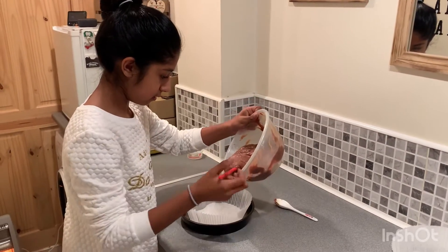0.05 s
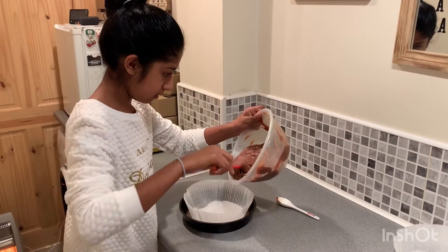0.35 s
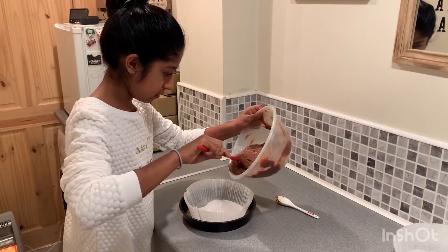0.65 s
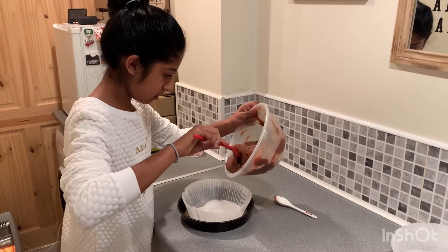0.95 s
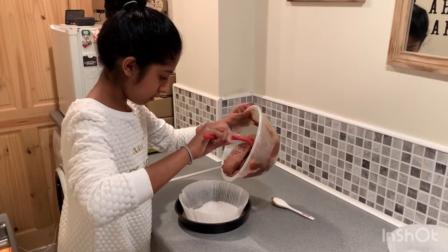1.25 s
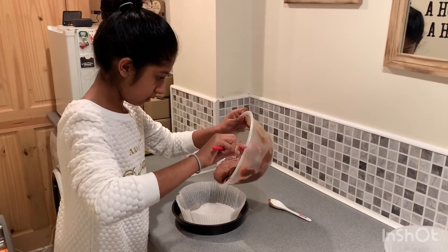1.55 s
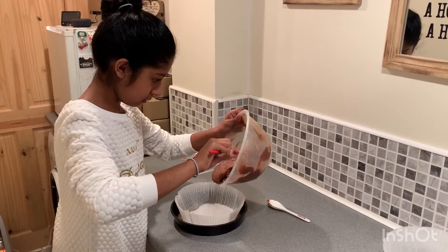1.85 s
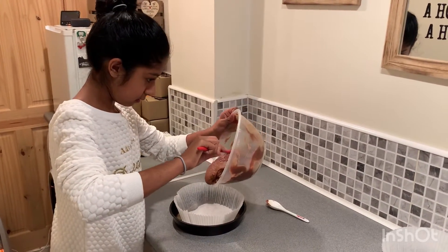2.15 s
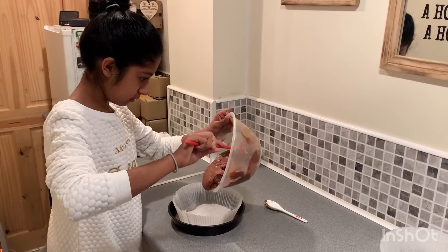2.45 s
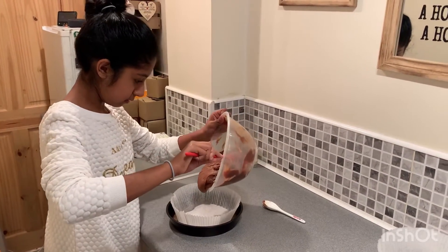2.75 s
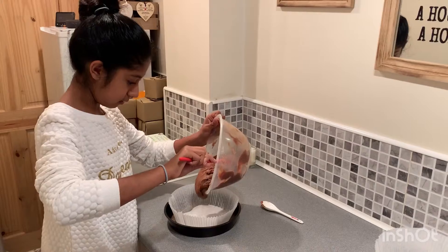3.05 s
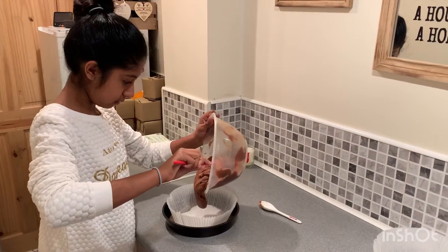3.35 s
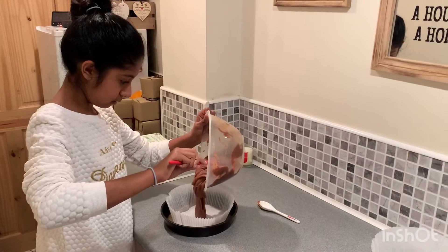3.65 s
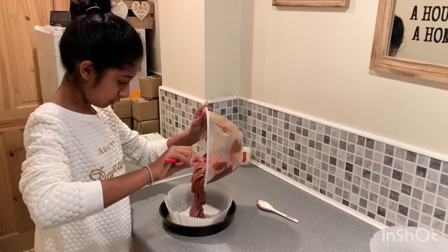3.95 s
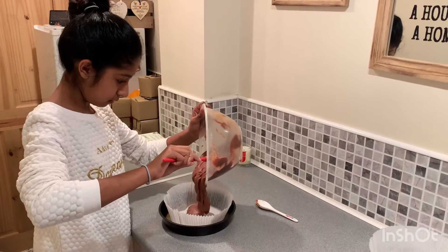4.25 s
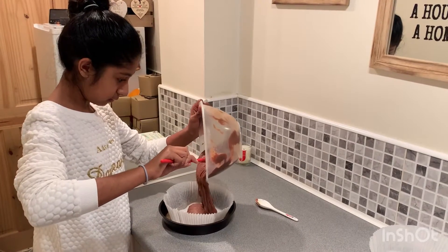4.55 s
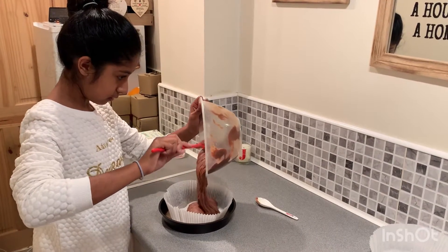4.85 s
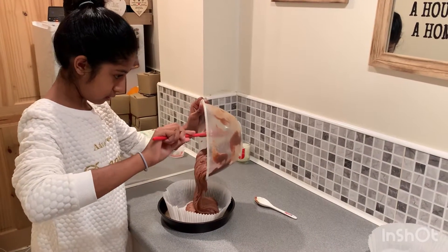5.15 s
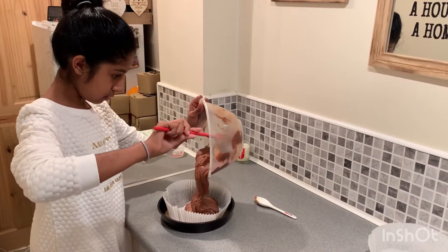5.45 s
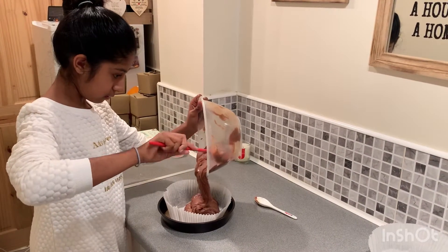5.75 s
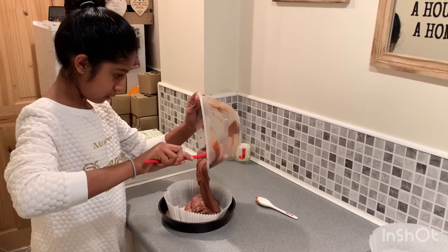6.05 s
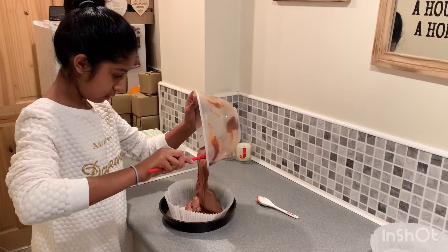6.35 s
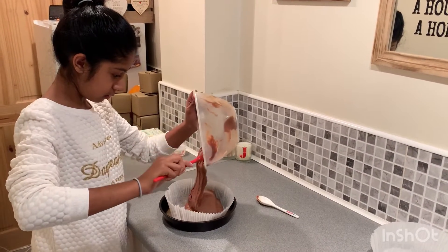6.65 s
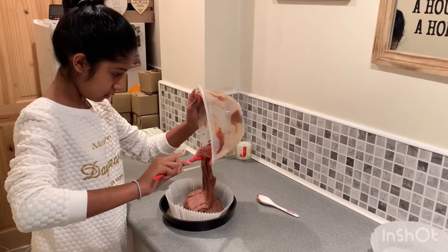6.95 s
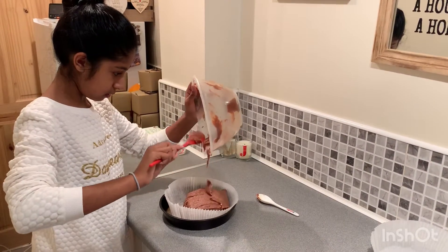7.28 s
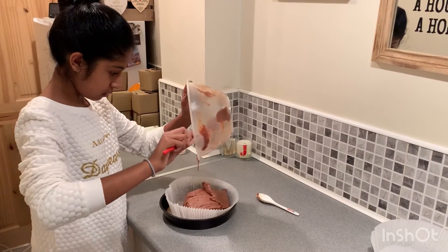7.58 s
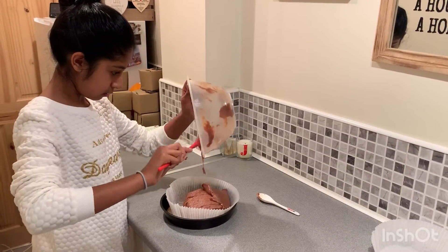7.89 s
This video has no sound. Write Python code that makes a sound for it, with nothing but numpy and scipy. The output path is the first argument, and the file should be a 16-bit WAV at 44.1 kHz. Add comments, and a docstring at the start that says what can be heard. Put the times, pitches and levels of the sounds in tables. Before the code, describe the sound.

Sticky cake batter squelches and crackles as a rubber spatula scrapes and knocks against a plastic mixing bowl in a quiet kitchen.

```python
"""A soft scrape and a squeak, then knocks: a spatula works thick cake batter out of a plastic bowl
into a paper-lined tin. Impacts and stick-slip friction sound low ringing tones of room and bowl.
Cavities in the batter squelch and plop, sticky threads snap, and batter and paper liner crackle.
The small kitchen adds a bright reverberation and a faint hum."""
import sys
import numpy as np
from scipy import signal
from scipy.fft import rfft, irfft, next_fast_len
from scipy.io import wavfile

SR = 44100
rng = np.random.default_rng(int(sys.argv[2]) if len(sys.argv) > 2 else 0)


def generate_wav(sig):
    """Save sig (samples, or channels by samples) to the path in sys.argv[1] as 16-bit PCM at SR."""
    pcm = np.round(np.clip(np.atleast_2d(sig).T, -1, 1) * 32767).astype(np.int16)
    wavfile.write(sys.argv[1], SR, pcm)


N = 349272
TIME, PADDED = np.arange(N) / SR, next_fast_len(N + SR // 10)
LN_1000 = np.log(1000)   # exponent of a 60 dB decay


def from_db(db):
    """Decibels to amplitude ratio."""
    return 10 ** (np.asarray(db) / 20)


def unit_rms(x):
    """Normalise to an rms of one."""
    return x / np.sqrt(np.mean(x ** 2) + 1e-20)


def at_hz(points, hz, column=1):
    """Interpolate a table column over log frequency."""
    table = np.array(points)
    return np.interp(np.log(hz + 1e-9), np.log(table[:, 0]), table[:, column])


def add(track, s, sound):
    """Superpose a sound on a track at s seconds."""
    start = max(round(s * SR), 0)
    track[start:start + len(sound)] += sound[:N - start]


def drift(per_s):
    """Random modulation: Gaussian values joined by straight lines."""
    knots = rng.standard_normal(4000)
    return np.interp(TIME * per_s, np.arange(len(knots)), knots)


def colour(x, spectrum, size=4096):
    """Minimum-phase filter of unit energy with the given spectrum."""
    cepstrum = irfft(np.log(from_db(at_hz(spectrum, np.fft.rfftfreq(size, 1 / SR)))))
    kernel = irfft(np.exp(rfft(2 * cepstrum[:size // 2], size)))
    return signal.oaconvolve(x, kernel / np.linalg.norm(kernel))[:len(x)]


def grains(per_s, spread_db, size):
    """Poisson impulses of uneven strength and sign."""
    strength = from_db(spread_db * np.minimum(rng.exponential(1, size), 3.5))
    return strength * rng.choice([-1, 1], size) * (rng.random(size) < per_s / SR)


def burst(length_s, per_s, first, size=8192):
    """A leading impulse and an exponentially dying shower; unit energy."""
    clicks = grains(per_s, 5.1, size) * np.exp(-TIME[:size] / max(length_s, .001))
    clicks[0] = first
    return clicks / np.linalg.norm(clicks)


# Each row: frequency in Hz, left-right coherence from 0 to 1.
COHERENCE = [(100, .95), (300, .6), (600, .55), (1200, .3), (2500, .4), (4500, .5), (7500, .88),
             (15000, .85)]
def diffuse(a, b):
    """Diffuse field: two independent noises become a partly coherent stereo pair."""
    alike = at_hz(COHERENCE, np.fft.rfftfreq(len(a), 1 / SR))
    mid, side = rfft(a) * np.sqrt((1 + alike) / 2), rfft(b) * np.sqrt((1 - alike) / 2)
    return irfft([mid + side, mid - side], len(a))


# Each row: frequency in Hz, relative spectral density in dB.
AIR_SPECTRUM = [(15, -18), (30, -4.5), (60, 3.5), (85, -1.5), (130, -6), (300, -11), (550, -10.5),
                (800, -18), (1300, -21.5), (2200, -33.5), (3200, -35), (4300, -48.5), (6500, -44),
                (16000, -44)]
# Mains hum and appliance whine. Each row: frequency in Hz, level in dB.
HUM_TONES = [(49, -70.5), (99, -72), (527.6, -69.5)]
def room_tone(air_db=-57.5):
    """Noise floor: broadband air noise under slightly wavering pure tones."""
    air = diffuse(*[colour(white, AIR_SPECTRUM) for white in rng.standard_normal((2, N))])
    hum = sum(from_db(db + 0.5 * drift(6.3)) * np.sqrt(2) * np.sin(2 * np.pi * (hz * TIME + rng.random()))
              for hz, db in HUM_TONES)
    return from_db(air_db) * air + hum


# Each row: frequency in Hz, reverberation time in seconds, echo gain in dB.
REVERBERATION = [(99, 0.46, -17), (296, 0.27, 3), (694, 0.24, 3.5), (1650, 0.49, 4), (4120, 0.19, 6),
                 (9350, 0.4, -2.5), (15300, 0.084, -7.5)]
def echoes(build_s=0.00024):
    """Impulse response: reflections off worktop and tiles decay at their own rate in each octave."""
    t, edges = TIME[:SR // 2], np.geomspace(60, 17000, 9)
    fields = [diffuse(*pair) for pair in rng.standard_normal((2, 2, len(t)))]
    echo = np.zeros((2, len(t)))
    for k, (low, high) in enumerate(zip(edges, edges[1:])):
        hz = np.sqrt(low * high)
        noise = signal.sosfilt(signal.butter(2, [low, high], "band", fs=SR, output="sos"), fields[k % 2])
        tail = noise * np.exp(-LN_1000 * t / at_hz(REVERBERATION, hz)) * (1 - np.exp(-t / build_s))
        gain = 2 * np.sqrt((high - low) / SR) * from_db(at_hz(REVERBERATION, hz, column=2))
        echo += gain * tail / np.linalg.norm(tail)
    return echo


def kitchen(x, move_s=1):
    """Reverberation of a moving source: as the bowl tilts, one echo pattern fades into the next."""
    out = np.zeros((2, N))
    for s in np.arange(0, N / SR + move_s, move_s):
        near = np.abs(TIME - s) < move_s
        part = x[near] * np.cos(np.pi / 2 * (TIME[near] - s) / move_s)
        for channel, echo in zip(out, echoes()):
            add(channel, TIME[near][0], signal.fftconvolve(part, echo))
    return out


# Each row: start in seconds, relative level in dB.
THREAD_SNAPS = [(0.9658, -29.5), (3.589, -42), (3.955, -35), (4.051, -30), (4.101, -40), (4.2783, -25),
                (5.194, -41), (7.011, -43), (7.509, -36), (7.742, -37)]
def snaps(level_db=-2, pair_hz=(8970, 14300), t60_s=0.0038):
    """Sudden release of tension: a thread of batter parts outside the rim with a very high tick."""
    out, t = np.zeros(N), TIME[:SR // 100]
    for s, db in THREAD_SNAPS:
        pitches = np.outer(pair_hz, 1 + .04 * rng.standard_normal())
        tone = np.sin(2 * np.pi * pitches * t).mean(axis=0)
        add(out, s, from_db(db + level_db) * np.exp(-LN_1000 * t / t60_s) * tone)
    return out


# Each row: start in seconds, relative level in dB, decay time in seconds, offset of the body in dB.
CRACKLES = [(0.252, -57.5, 0.021, -8), (.35, -59, 0.066, -25), (.849, -62, 0.0034, 15.5),
            (1.347, -40, 0.028, 8.5), (1.452, -41.5, 0.1, 1), (1.628, -39.5, 0.067, -17),
            (1.761, -32.5, 0.095, 9), (1.953, -42, 0.027, 18.5), (2.022, -43, 0.0093, 15),
            (2.209, -50.5, 0.014, 17), (2.312, -29.5, 0.12, -2), (2.505, -47, 0.037, -2),
            (2.77, -73, 0.11, 2), (3.28, -62, 0.0074, -15), (3.478, -56, 0.012, -15),
            (3.584, -38.5, 0.012, 6.5), (3.594, -34.5, 0.0093, 4.5), (3.609, -28, 0.0085, 5),
            (3.801, -40.5, 0.007, 9), (3.924, -46.5, .02, -3), (3.944, -41, 0.008, 4),
            (3.956, -32, 0.0037, -3.5), (4.013, -39, 0.014, -1), (4.053, -35.5, 0.0036, 2.5),
            (4.083, -40, 0.013, 9.5), (4.101, -33, 0.0036, 7.5), (4.276, -33, 0.0088, -1),
            (4.474, -45, 0.011, 13), (4.559, -33, 0.006, 7.5), (5.19, -36, 0.023, -7),
            (5.225, -59, 0.0069, -4), (5.46, -34.5, 0.036, -3), (5.512, -40, 0.016, 12),
            (5.555, -40, 0.0098, 2), (5.685, -44.5, 0.025, 12), (5.733, -43.5, 0.039, 13),
            (6.072, -54, 0.018, -8), (6.469, -51, 0.038, -1), (6.693, -50.5, 0.0056, 7),
            (6.852, -54, 0.11, -2), (7.012, -33.5, 0.021, -34), (7.132, -50, 0.0099, 4),
            (7.237, -43.5, 0.0067, 10), (7.291, -47.5, 0.003, 12.5), (7.739, -35.5, 0.52, 8)]
# Each row of both spectra: frequency in Hz, relative density in dB.
FIZZ_SPECTRUM = [(200, -9), (2000, -2.5), (4500, 4), (7000, 3.5), (9000, 9), (13000, -1.5), (15500, -6)]
PAPER_SPECTRUM = [(60, -36), (300, -7), (700, 11), (1400, 0), (2100, 14.5), (3100, 7), (4500, 4.5),
                  (7000, -16.5), (12000, -0.5)]
def crackles(fizz_db=15, paper_db=11):
    """Impulsive noise: tiny batter films break with a bright fizz; bigger folds add a papery body."""
    fizz, paper = np.zeros((2, N))
    for s, db, length, body_db in CRACKLES:
        lead = 1.3 * min(1, 0.0094 / length)   # short crackles open with a clear snap
        clicks = from_db(db) * burst(length, per_s=1500, first=lead)
        add(fizz, s, clicks)
        add(paper, s, from_db(body_db) * clicks)
    return (from_db(fizz_db) * colour(fizz, FIZZ_SPECTRUM),
            from_db(paper_db) * colour(paper, PAPER_SPECTRUM))


# Each row: start in seconds, level in dB, pitch in Hz, 60 dB decay time in seconds.
SQUEAKS = [(.051, -49, 3600, 0.057), (1.141, -59.5, 4350, 0.046), (1.76, -29.5, 2040, 0.058),
           (7.012, -42, 2434, 0.041)]
def squeaks(waver=.07, attack_s=.001):
    """Nearly periodic stick-slip: the rubber blade sounds a short, rough note on the wet wall."""
    out, t = np.zeros(N), TIME[:SR // 8]
    for s, db, hz, t60 in SQUEAKS:
        pitch = hz * (1 + waver * drift(490)[:len(t)])
        envelope = (1 - np.exp(-t / attack_s)) * np.exp(-LN_1000 * t / t60)
        add(out, s, from_db(db) * envelope * np.sin(2 * np.pi * np.cumsum(pitch) / SR))
    return out


# Each row: start in seconds, relative levels of pop and chirp in dB, final chirp pitch in Hz.
AIR_POCKETS = [(0.449, -38.5, -53, 1320), (1.340, -31, -35.5, 2660), (2.480, -27, -32.5, 2546),
               (2.763, -34.5, -48, 2090), (3.046, -30.5, -46, 2210), (5.507, -51, -37, 2420),
               (6.521, -36.5, -60, 1930)]
# Each row: frequency in Hz, relative spectral density in dB.
POP_SPECTRUM = [(200, -11.5), (450, -0.5), (800, -5.5), (1100, -4), (1600, -10), (2300, -16.5), (3000, -32),
                (6000, -41.5)]
def plops(pop_db=13, chirp_db=2, chirp_s=0.00579, rise_octaves=1.32):
    """Helmholtz resonance: trapped air escapes with a dull pop and a rising chirp as the pocket opens."""
    pops, chirps = np.zeros((2, N))
    opening = np.linspace(0, 1, int(chirp_s * SR))
    swell = np.sin(np.pi * opening ** 2)
    for s, db, tone_db, hz in AIR_POCKETS:
        add(pops, s, from_db(db + pop_db) * burst(length_s=.009, per_s=2500, first=2.5))
        pitch = hz * 2 ** (rise_octaves * (opening - 1))
        add(chirps, s, from_db(tone_db + chirp_db) * swell * np.sin(2 * np.pi * np.cumsum(pitch) / SR))
    return colour(pops, POP_SPECTRUM) + chirps


def ribbon_folds(count=24, start_s=3.5, end_s=7.6, low_hz=2380, high_hz=12600):
    """Viscous buckling: the falling batter folds at uneven intervals; gives rows of faint squelches."""
    rows = []
    for k, (when, force, pitch) in enumerate(rng.random((count, 3))):
        s = start_s + (end_s - start_s) * (k + when) / count
        db = -68.5 + 5 * (2 * force - 1)
        rows.append((s, db, low_hz * (high_hz / low_hz) ** pitch, 0.012, 2))
    return rows


# Each row: start in seconds, level in dB, pitch in Hz, length in seconds, Q (raised to at least 1).
SQUELCHES = [(0.845, -58, 9600, .004, 6.3), (0.963, -55.5, 9300, 0.012, 0.73),
             (1.226, -65, 2390, 0.021, 0.42), (1.273, -65, 1260, .03, 1.1), (1.265, -63, 8800, .015, 0.9),
             (1.343, -48.5, 1440, 0.075, 1.7), (1.861, -50, 3130, 0.012, 6.3),
             (1.893, -51, 2900, 0.0092, 2.5), (1.951, -46, 4000, 0.015, 1), (2.2, -48.5, 2830, 0.011, 2.9),
             (2.314, -61, 14000, 0.1, 2.5), (2.6, -79, 5000, 0.24, 1.5), (2.538, -58, 14000, .025, 1.9),
             (3.249, -54.5, 1990, 0.0084, 1.1), (3.307, -69.5, 4000, 0.064, 2.6),
             (4.362, -56, 4150, 0.015, 2.5), (4.413, -51, 2080, 0.0099, 5.4), (4.556, -48, 4400, 0.013, 3),
             (4.697, -63, 14100, 0.014, 2.5), (4.835, -61, 13800, 0.065, 1.8),
             (5.133, -56.5, 3770, 0.13, 2.6), (5.254, -45.5, 2340, 0.022, 4),
             (5.307, -46, 1940, 0.023, 2.3), (5.446, -45.5, 4430, 0.0094, 1.3),
             (5.507, -43, 1610, 0.019, 2.8), (5.555, -43.5, 2540, 0.01, 3.1),
             (5.725, -52, 2500, 0.017, 3.2), (6.166, -63, 2440, 0.021, 3.6),
             (6.314, -61.5, 2240, 0.012, 2.5), (7.004, -47.5, 12900, 0.018, 2),
             (7.24, -59, 1180, 0.063, 1.6), (7.818, -54, 4500, 0.023, 12), (7.883, -47, 2540, 0.024, .71)]
def squelches(slips_per_s=3000):
    """Cavity resonance: a swell of tiny slips rings the gap between blade and batter."""
    out = np.zeros(N)
    for s, db, hz, length, q in SQUELCHES + ribbon_folds():
        size = max(int(length * SR), 256)
        slips = grains(slips_per_s, 10.6, size) * np.sin(np.pi * np.linspace(0, 1, size) ** 0.35)
        cavity = signal.iirpeak(hz, max(q, 1), fs=SR)
        add(out, s, from_db(db) * unit_rms(signal.lfilter(*cavity, signal.lfilter(*cavity, slips))))
    return out


# Each row: frequency in Hz, relative spectral density in dB.
SMEAR_SPECTRUM = [(500, -12.5), (800, 6.5), (1200, -1.5), (1600, -0.5), (2100, 3), (2600, 0.5), (3100, -1),
                  (4400, -3.5), (6000, -10.5), (9000, -11.5), (15000, -15)]
def wet_smear(catch_db=3.5, catches_per_s=45, smack_db=-7):
    """Modulated shot noise: pockets of many sizes crackle and smack as the blade catches and slips."""
    drag = unit_rms(from_db(catch_db * drift(catches_per_s)))
    pockets = np.zeros(N)
    for hz in np.geomspace(900, 14000, 16):
        opening = from_db(5 * drift(24))
        pockets += signal.lfilter(*signal.iirpeak(hz, 6, fs=SR), opening * unit_rms(grains(1000, 6.5, N)))
    smacks = from_db(smack_db) * unit_rms(grains(90, 6.6, N))
    return colour(drag * (unit_rms(pockets) + smacks), SMEAR_SPECTRUM)


# Low ringing tones of room and bowl, sounded by knocks and scraping, and the bowl's stiff upper modes.
# Each row: frequency in Hz, relative level in dB, 60 dB decay time in seconds.
LOW_RESONANCES = [(77, 2.5, 0.37), (145, 0, 0.22), (167.6, -10.5, 0.41), (203, -13.5, 0.18),
                  (260.4, -5.5, 0.21), (283.7, -3.5, 0.23), (326.6, 4, 0.13), (369, 0, 0.13),
                  (427.8, -3.5, 0.12), (492.8, -4.5, 0.18), (607.6, -4, 0.15), (653, -2.5, 0.12),
                  (732, -0.5, 0.058), (842, -20, 0.19)]
RIM_MODES = [(1690, -23, 0.074), (1920, -6, 0.078), (1995, 7.5, 0.14), (2250, 2, 0.038), (3600, 6, 0.026),
             (4230, -20, .023)]
LOW_DETUNE, RIM_DETUNE = .012, .04   # random spread as a fraction of pitch
def ring(modes, weights, tuning=1, size=16000):
    """Modal superposition: a sum of damped sines, each weighted by how hard it is driven."""
    hz, db, t60 = np.array(modes).T[:, :, None]
    t = TIME[:size]
    gains = from_db(db) * np.reshape(weights, (-1, 1))
    partials = gains * np.exp(-LN_1000 * t / t60) * np.sin(2 * np.pi * hz * tuning * t)
    return partials.sum(axis=0) / np.linalg.norm(gains)


# Each row: start in seconds, length in seconds, relative judder level in dB,
# change by the end in dB, offset of the wet smear in dB.
STROKES = [(-.04, 0.45, -56, -19.5, 0), (1.353, 0.16, -51.5, -5, -1.5), (1.554, 0.18, -69.5, 8, 5.5),
           (1.868, 0.1, -38.5, -5, -7), (2.09, 0.076, -57, 1.5, -5), (2.184, 0.17, -56.5, 10, -1.5),
           (2.373, 0.15, -45.5, -4, -6.5), (2.68, 0.17, -54.5, -5, -14), (3.136, 0.16, -75, 9.5, -8),
           (3.7, 0.54, -65.5, -0.5, -11), (4.259, 0.19, -52, 4, -3), (4.477, 0.076, -44.5, 2.5, -6),
           (4.703, 0.2, -52.5, -1.5, -2.5), (4.96, 0.32, -69, 12, -1.5), (5.199, 0.15, -45.5, 0, -5),
           (5.392, .17, -51.5, -1, -2), (5.638, 0.091, -52, -2, -2.5), (5.83, 1, -63, -7.5, -3.5),
           (7.515, 0.5, -62, 17, -3)]
def pressure(attack_s=0.016, release_s=0.049):
    """Friction noise follows the normal force: each stroke bites, presses or eases, and lets go."""
    judder, smear = from_db([-91.5, -81])   # batter creeps past the resting blade
    for start, length, db, change_db, wet_db in STROKES:
        age = TIME - start
        bite = np.clip(age / attack_s, 0, 1)
        let_go = np.exp(-np.maximum(age - length, 0) / release_s)
        stroke = from_db(db + change_db * np.clip(age / length, 0, 1)) * bite * let_go
        judder, smear = judder + stroke, smear + from_db(wet_db) * stroke
    return judder, smear


def scraping(judder_db=-3, smear_db=-3, rim_db=-19):
    """Stick-slip friction: coarse slips sound resonances of room and bowl while fine wet ones hiss."""
    judder, smear = pressure()
    slips = unit_rms(grains(500 * from_db(3.1 * drift(30)), 6.0, N))
    wet = wet_smear()
    modes = np.array(LOW_RESONANCES)[4:]
    weights = (-1) ** np.arange(len(modes)) * modes[:, 0]   # higher tones are driven harder
    low = unit_rms(signal.oaconvolve(slips, ring(modes, weights))[:N])
    rim = unit_rms(signal.oaconvolve(slips, ring(RIM_MODES, 1))[:N])
    rim = np.interp(TIME + np.cumsum(RIM_DETUNE * drift(13)) / SR, TIME, rim)   # the pitch wanders
    return from_db(judder_db) * judder * low + smear * (from_db(smear_db) * wet + from_db(rim_db) * rim)


# Each row: start in seconds, relative level in dB, favoured pitch in Hz,
# reach around it in octaves, relative tick level in dB.
KNOCKS = [(.451, -35.5, 146, 0.85, -89), (.455, -36.5, 314, 0.76, -67), (.468, -35.5, 152, 1.05, -66),
          (.598, -48.5, 300, 0.61, -86), (1.341, -51, 416, 1.5, -58), (1.35, -45, 735, 0.41, -55),
          (1.408, -40, 740, 0.76, -41), (1.451, -45.5, 344, 0.48, -63), (1.761, -26.5, 464, 1.6, -22),
          (1.782, -30.5, 390, 1.05, -28.5), (1.871, -35, 697, 0.34, -32.5), (1.892, -37, 746, 0.15, -32),
          (2.023, -40, 410, 1.3, -42), (2.311, -22, 357, 0.9, -27.5), (2.313, -27.5, 720, 0.34, -50),
          (2.317, -24.5, 158, 0.87, -54), (2.33, -43, 76.5, 0.55, -60), (2.336, -19.5, 164, 0.63, -52),
          (2.352, -34, 300, 0.46, -60), (4.277, -29, 322, 0.77, -29), (4.278, -28, 656, 0.45, -50),
          (4.379, -32.5, 568, 0.68, -37), (4.418, -42, 520, 0.66, -49), (4.487, -24, 560, 0.55, -31),
          (4.506, -30, 557, 0.29, -34.5), (4.539, -32, 441, 0.25, -45), (4.722, -34.5, 624, 0.41, -47),
          (4.742, -41, 533, 1, -39), (5.193, -34, 387, 1.1, -34.5), (5.256, -40, 420, 0.99, -45),
          (5.311, -32, 500, 0.84, -41), (5.337, -35.5, 400, 0.58, -48), (5.455, -34.5, 502, 0.44, -29),
          (5.462, -36.5, 620, 0.42, -36), (5.745, -46.5, 517, 0.77, -51), (6.521, -47, 583, 0.4, -34.5),
          (7.507, -32.5, 320, 0.64, -30), (7.508, -35, 662, 0.4, -52), (7.528, -40, 313, 0.67, -51),
          (7.615, -43, 68, 1.8, -76), (7.662, -42, 342, 1.9, -68)]
# Each entry: index of a low resonance that starts in opposite phase.
INVERTED_TONES = [2, 3, 10, 11]
# Each row: frequency in Hz, relative spectral density in dB.
TICK_SPECTRUM = [(400, -28), (800, 6), (1200, -1), (2100, 10.5), (3100, 0), (4400, -1.5), (6500, -6.5),
                 (15000, -34)]
def knocks(ring_db=-2.5, thud_db=-1, tick_db=13, rim_db=-19, contact_s=0.002, thud_cycles=5):
    """Impact excitation: the soft blade thuds and rings tones near its pitch; its edge ticks."""
    body, ticks = np.zeros((2, N))
    low_hz = np.array(LOW_RESONANCES)[:, 0]
    polarity = np.where(np.isin(np.arange(len(low_hz)), INVERTED_TONES), -1, 1)
    for s, db, hz, reach, hard_db in KNOCKS:
        near = 1 / (1 + (np.log2(low_hz / hz) / reach) ** 4)
        shift = rng.standard_normal()   # each knock rings slightly sharp or flat
        uneven = from_db(2 * rng.standard_normal(len(low_hz)))
        low = ring(LOW_RESONANCES, polarity * near * uneven, 1 + LOW_DETUNE * shift)
        add(body, s, from_db(db + ring_db) * low * (1 - np.exp(-TIME[:len(low)] / contact_s)))
        cycles = TIME[:SR // 3] * hz
        age = cycles * reach * LN_1000 / thud_cycles   # a broadband blow dies within a few cycles
        add(body, s, from_db(db + thud_db) * age * np.exp(1 - age) * np.sin(2 * np.pi * cycles))
        chatter = from_db(hard_db) * burst(length_s=0.002, per_s=1600, first=0.9)
        add(ticks, s, chatter)
        rim = ring(RIM_MODES, 1, 1 + RIM_DETUNE * shift, size=4096)
        add(body, s, from_db(rim_db) * signal.fftconvolve(chatter, rim))
    return body + from_db(tick_db) * colour(ticks, TICK_SPECTRUM)


# Each row: frequency in Hz, level of the left channel over the right in dB.
LEFT_BIAS = [(150, -1.5), (300, 1.5), (500, 2.2), (1200, 3.5), (2200, 0.4), (4200, 4.5), (8000, -0.5)]
def scene():
    """Acoustic shadow: the bowl faces away, so the batter inside is heard mostly by reflection."""
    hits = knocks()
    wet = scraping() + squelches() + squeaks()
    pops = plops()
    fizz, paper = crackles()
    # Each row: source, direct gain in dB, gain into the room in dB.
    layers = [(snaps(), 0, -3), (fizz, -2, -0.5), (paper, -6, -1),
              (pops, -2, -1), (wet, -7, 0), (hits, 0, 1.57)]
    direct = sum(from_db(db) * source for source, db, _ in layers)
    sent = sum(from_db(db) * source for source, _, db in layers)
    bias_db = at_hz(LEFT_BIAS, np.fft.rfftfreq(PADDED, 1 / SR))
    spectrum = rfft(direct + kitchen(sent), PADDED) * from_db([bias_db / 2, -bias_db / 2])
    return irfft(spectrum, PADDED)[:, :N] + room_tone()


def record(dry):
    """Phase delay and band limit: the treble reaches the right channel late, and the top is cut."""
    treble_lag_s, cutoff_hz = .0002155, 15900
    hz = np.fft.rfftfreq(PADDED, 1 / SR)
    lag = treble_lag_s * np.interp(hz, [1000, 2200, 5000], [0, .5, 1])
    right = irfft(rfft(dry[1], PADDED) * np.exp(-2j * np.pi * hz * lag), PADDED)[:N]
    return signal.sosfilt(signal.ellip(10, .2, 80, cutoff_hz, fs=SR, output="sos"), [dry[0], right])


dry = scene()
out = record(dry)
generate_wav(out)
```